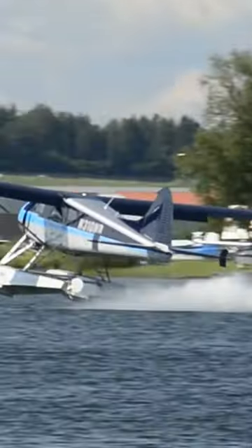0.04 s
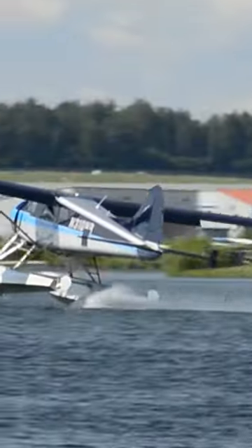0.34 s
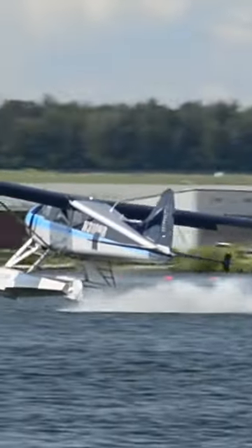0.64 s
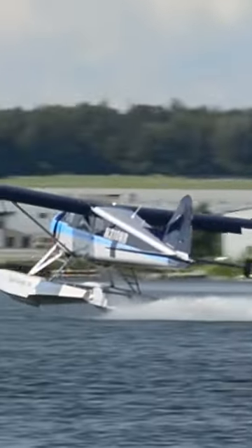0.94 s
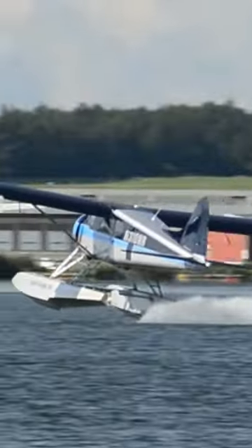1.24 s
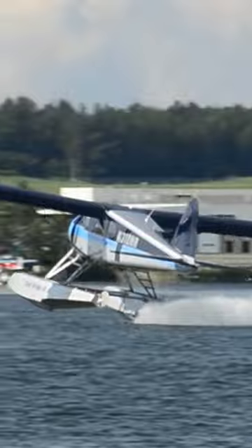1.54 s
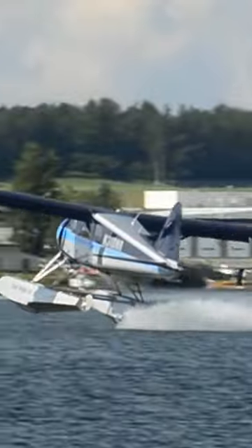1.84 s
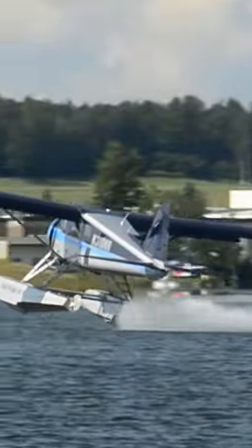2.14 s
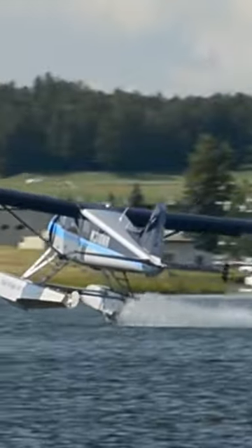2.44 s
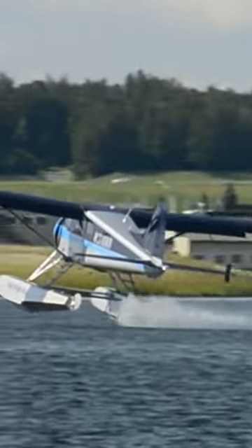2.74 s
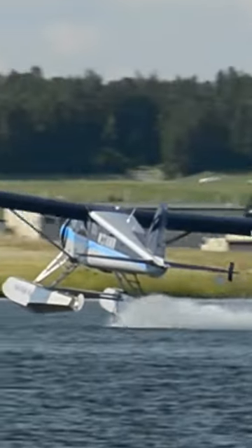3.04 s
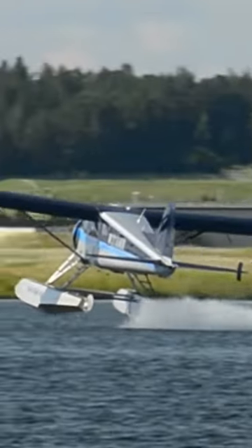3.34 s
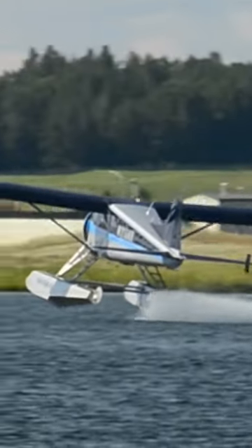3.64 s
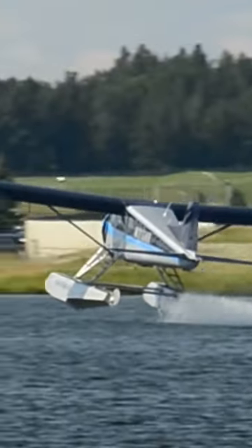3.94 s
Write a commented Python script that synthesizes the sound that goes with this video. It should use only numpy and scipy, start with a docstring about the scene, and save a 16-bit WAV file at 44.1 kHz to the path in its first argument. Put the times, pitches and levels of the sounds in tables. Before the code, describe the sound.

A floatplane's propeller engine drones loudly as it skims across a lake, with faint spray hiss.

```python
"""The loud, deep drone of a floatplane skimming across a lake at full power and moving away.
Its nine-cylinder radial engine puffs out exhaust so fast that the puffs blend into notes, and the
propeller adds a hum. The tone shifts as the plane is heard first from the side, then from behind.
Rough exhaust gas roars in time with the firings. The floats splash once and throw up hissing spray,
over a little rumbling wind."""
import sys
import numpy as np
from scipy import signal
from scipy.io import wavfile
from scipy.ndimage import uniform_filter1d

SR = 44100
rng = np.random.default_rng(int(sys.argv[2]) if len(sys.argv) > 2 else 0)


def unload_wav(signal):
    """Save mono or channel-first audio to the path in sys.argv[1] as 16-bit WAV at rate SR, clipped to [-1, 1]."""
    wavfile.write(
        sys.argv[1],
        SR,
        np.round(np.clip(np.atleast_2d(signal).T, -1, 1) * 32767).astype(np.int16),
    )


N = 176400
TIME = np.arange(N) / SR
FRAME_S = np.arange(N // 256 + 5)[:, None] * 256 / SR  # coarse time steps for slow changes
BIN_HZ = np.fft.rfftfreq(1024, 1 / SR)  # the pitches at which noise is shaped
CYLINDERS, CRANK_TURNS = 9, 2  # in one cycle each cylinder fires once and the crank turns twice

# How fast the engine runs: time_s, cycle_rate_hz
ENGINE_SPEED = [(0.3, 18.065), (1.4, 18.052), (2.0, 17.97), (2.65, 17.91), (2.95, 17.941), (3.2, 17.896),
                (3.45, 17.903), (3.7, 17.849)]
START_RATE_HZ = ENGINE_SPEED[0][1]

def engine_cycles():
    """Counts the cycles run so far. A "harmonic" is a tone that vibrates a whole number of times in each."""
    return np.cumsum(curve(ENGINE_SPEED)) / SR


# How loud the engine's main note is: time_s, level_db (before a small lift)
FIRING_LEVEL = [(0.06, -19.5), (1.44, -18.5), (2.18, -20.5), (2.24, -17.5), (2.75, -21), (2.84, -17.5),
                (3.19, -21.5), (3.47, -18), (3.7, -24), (3.94, -20.5)]

def firing_tone(cycles):
    """The nine firings of each cycle add up to the firm main note."""
    lift_db = 0.53
    wave = np.cos(2 * np.pi * CYLINDERS * cycles + puff_phase(CYLINDERS))
    return np.sqrt(2) * gain_of(curve(FIRING_LEVEL) + lift_db) * wave


# The balance of the drone's low tones: harmonic_number, from_side_db, from_behind_db
DRONE_TONES = [(4, -18.5, -12), (5, -25, -21), (7, -18, -8.5), (8, -30, -18), (10, -18.5, -18.5),
               (11, -8.5, -7), (12, -12, -9.5), (13, -17.5, -10.5), (14, -20, -8), (16, -6, -9.5),
               (17, -18, -22), (18, -9.5, -19), (19, -25, -16), (20, -7.5, -8.5), (21, -12, -17.5),
               (22, -5, -4), (23, -15.5, -18.5), (24, -20, -9.5), (25, -13.5, -25), (26, -14.5, -9),
               (27, -14, -13.5), (28, -12.5, -17.5), (29, -15, -20), (30, -23.5, -12.5)]
# High tones that sing out of the roar: harmonic_number -> lift_db
SINGING_TONES = {32: 3, 54: 4, 80: 8, 82: 6}

def exhaust_drone(cycles):
    """Nine unevenly spaced puffs a cycle make a stack of harmonics, whose mix shifts as the plane turns."""
    side_db, tail_db, top_harmonic = -19.5, -20.5, 112
    high_db, high_from_hz, high_db_per_octave, high_tail_lift_db = -41, 724, -19.5, 2
    t = FRAME_S[:, 0]
    behind = turned(t)
    low_db = {round(k): (1 - behind) * (side_db + side) + behind * (tail_db + tail)
              for k, side, tail in DRONE_TONES}
    out = np.zeros(N)
    for k in range(1, top_harmonic + 1):
        hz = k * START_RATE_HZ
        if k in low_db:
            db = low_db[k]
        elif k > max(low_db):
            db = high_db + high_db_per_octave * np.log2(max(hz / high_from_hz, 1))
            db = db + high_tail_lift_db * behind + SINGING_TONES.get(k, 0)
        else:
            continue
        # Echoes smear the puffs, more so for high tones and from behind.
        smear = 0.676 * rng.standard_normal() + 0.92 * behind * rng.standard_normal()
        phase = puff_phase(k) + smear * (hz / 268.2) ** 2
        steady = gain_of(swell_db(t, hz)) * np.exp(1j * phase)
        # The air makes high tones waver more, and faster. All waver a little more from behind.
        waver = 0.11 + (hz / 810) ** 3 + 0.12 * behind
        wander = waver * drift(rate_hz=2.2 * (1 + hz / 600))
        strength = gain_of(db) * (steady + wander) / np.hypot(1, waver)
        wave = np.exp(2j * np.pi * k * cycles)
        out += np.sqrt(2) * (np.interp(TIME, t, strength) * wave).real
    return out


def puff_phase(harmonic):
    """Where a harmonic's wave starts: each cylinder's puff takes its own path round the exhaust ring."""
    longest_path_s, outlet_turns = 0.001634, 0.062
    fired = np.arange(CYLINDERS) / CYLINDERS
    place_turns = CRANK_TURNS * fired + outlet_turns  # the firing skips every other cylinder
    path_share = 2 * abs(place_turns % 1 - .5)
    leaves_pipe = fired + longest_path_s * START_RATE_HZ * path_share
    return np.angle(np.exp(-2j * np.pi * harmonic * leaves_pipe).sum())


# Brief swells and dips in the engine: peak_s, spread_s, pitch_hz, glide_hz_per_s, width_hz, lift_db
SWELLS = [(.5, .17, 600, 0, 170, -2.5), (.3, .2, 1080, 0, 130, 4.5), (.85, .08, 490, 0, 45, 4),
          (.94, .1, 745, 150, 45, 11), (1.2, .15, 835, 300, 35, 4.5), (1.45, .4, 1500, 0, 250, -3),
          (1.685, .06, 728, 0, 40, 12), (1.87, .1, 396, 0, 15, 3), (2.03, .08, 735, 0, 45, 6.5),
          (2.1, .6, 485, -55, 42, 5), (2.1, 1.0, 210, 0, 90, 1.5), (2.33, .18, 1030, 0, 170, 4.5),
          (2.1, .25, 1520, 0, 180, 2.5), (2.49, .05, 780, 0, 130, 5.5), (3.2, .12, 780, 0, 60, 4),
          (3.55, .5, 1460, 0, 110, 4), (3.6, .45, 380, 0, 55, 2), (3.8, .14, 1750, 0, 110, 6.5)]

def swell_db(t, hz):
    """Narrow bands of the drone and roar grow louder or softer for a moment; some slide in pitch."""
    return sum(db * np.exp(-((t - peak) / spread) ** 2 - ((hz - pitch - glide * (t - peak)) / width) ** 2)
               for peak, spread, pitch, glide, width, db in SWELLS)


# How loud the propeller hums: time_s, level_db
PROPELLER_LEVEL = [(0.05, -23.5), (0.2, -17), (0.5, -18.0), (0.72, -23), (1.0, -17), (1.2, -22.6),
                   (1.5, -22.5), (1.7, -20), (1.88, -26), (2.05, -22), (2.36, -20.5), (2.5, -24),
                   (2.9, -22.5), (3.1, -23), (3.3, -23), (3.45, -29), (3.65, -22), (3.8, -30.5),
                   (3.95, -19.5)]

def propeller(cycles):
    """Three blades pass six times a cycle; their hum weakens and breaks up as the plane turns away."""
    passes, start_turns = 6, 0.25
    wave = np.sin(2 * np.pi * (passes * cycles + start_turns))
    return np.sqrt(2) * gain_of(curve(PROPELLER_LEVEL)) * wave


# The roar's mix of bass and treble from the side: pitch_hz, relative_db
ROAR_COLOUR = [(30, -28.5), (90, -3), (200, -4), (330, -3.5), (480, -1.5), (740, -4), (880, -11.5),
               (1050, -10), (1320, -18.5), (1450, -15), (1600, -19.5), (2000, -25.5), (2800, -33.5),
               (4000, -34.5), (4800, -41.5), (6200, -47.5), (7200, -59.5), (15000, -81.5)]
# How that mix changes from behind: pitch_hz, lift_db
ROAR_LIFT_BEHIND = [(30, 6.5), (200, 4.5), (400, 1.5), (750, -1), (1200, 6), (1600, 3.5), (2200, 3),
                    (4000, 0)]

def exhaust_roar(cycles):
    """Swirling gas puffs with each firing, crank turn and roughly each cycle; it blurs from behind."""
    level_db, blur_share = -22.5, 0.39
    shape_db = colour(ROAR_COLOUR) + turned(FRAME_S) * colour(ROAR_LIFT_BEHIND)
    gas = noise(shape_db + swell_db(FRAME_S, BIN_HZ), patch_db=1.65)
    clear = 1 - blur_share * turned(TIME)
    puffs = throb(cycles, CYLINDERS, depth=0.15 * clear)
    puffs *= throb(cycles, CRANK_TURNS, depth=0.21 * clear)
    puffs *= throb(cycles, 0.96, depth=0.15 * clear)
    return gain_of(level_db) * gas * puffs


# How loud the spray off the floats is: time_s, level_db
SPRAY_LEVEL = [(0, -53), (.23, -50.5), (.3, -46), (.62, -45), (1.05, -51.5), (1.5, -49.5), (1.75, -46),
               (2.03, -41), (2.42, -41), (2.5, -43), (2.55, -44.5), (3.0, -53.5), (3.5, -50.5), (4, -45.5)]
# The spray's mix of bass and treble: pitch_hz, relative_db
SPRAY_COLOUR = [(500, -23), (1500, -13.5), (2400, 1.5), (3300, 3), (4100, 1.5), (4800, -11), (6300, -11),
                (7100, -23.5), (8500, -27), (10000, -36.5), (15000, -43.5)]

def spray(cycles):
    """Spray hisses in surges, flutters with the crank and loses treble as the plane turns away."""
    treble_from_hz, dulling_db_per_octave = 3300, 6
    octaves = np.log2(np.maximum(BIN_HZ / treble_from_hz, 1))
    treble_db = dulling_db_per_octave * (.5 - turned(FRAME_S)) * octaves
    water = noise(colour(SPRAY_COLOUR) + treble_db, patch_db=1.7)
    return gain_of(curve(SPRAY_LEVEL)) * water * throb(cycles, CRANK_TURNS, depth=0.22)


# The splash's mix of bass and treble: pitch_hz, relative_db
SPLASH_COLOUR = [(1500, -11), (4000, 0.5), (6300, -3.5), (8800, -10), (11000, -21.5)]

def splash():
    """A float meets the water again: a crisp burst of drops that dies away."""
    start_s, rise_s, decay_s, level_db, clump_db = .28, .03, 0.15, -56, 6.5
    age = np.maximum(TIME - start_s, 0)
    burst = np.minimum(age / rise_s, 1) * np.exp(-age / decay_s)
    flicker = unit_level(uniform_filter1d(rng.standard_normal(N), size=130))
    clumps = unit_level(gain_of(clump_db * flicker))
    return gain_of(level_db) * burst * clumps * noise(colour(SPLASH_COLOUR), patch_db=0)


# The wind's mix, nearly all bass: pitch_hz, relative_db
WIND_COLOUR = [(5, -6), (25, 1), (50, -4.5), (100, -11), (300, -26), (2000, -66.5)]

def wind(level_db=-44.5):
    """Wind rumbles on the microphone in soft gusts."""
    return gain_of(level_db) * noise(colour(WIND_COLOUR), patch_db=4)


# How loud the background hiss is: time_s, level_db (before the lift)
HISS_LEVEL = [(0, -69), (1.2, -71), (2.2, -69), (3.2, -65.5), (4, -66.5)]
# Its nearly even mix of bass and treble: pitch_hz, relative_db
HISS_COLOUR = [(1000, 0), (8000, 0), (15000, -1)]

def hiss(lift_db=5.5):
    """A faint, smooth hiss that slowly grows."""
    return gain_of(curve(HISS_LEVEL) + lift_db) * noise(colour(HISS_COLOUR), patch_db=0)


def turned(t, halfway_s=1.88, length_s=2.06):
    """Near 0 while the plane is heard from the side, near 1 once it is heard from behind."""
    return .5 + .5 * np.tanh(2 * (t - halfway_s) / length_s)


def throb(cycles, beats_per_cycle, depth):
    """A volume that rises and falls with the engine."""
    return 1 + depth * np.cos(2 * np.pi * (beats_per_cycle * cycles + rng.random()))


def gain_of(db):
    """Turns decibels into a number to multiply by."""
    return 10 ** (np.asarray(db) / 20)


def unit_level(x):
    """Scales a signal so its average level (rms) is 1."""
    return x / np.sqrt(np.mean(abs(x) ** 2) + 1e-20)


def curve(points):
    """Joins a table's points over time, giving a value for every sample."""
    return np.interp(TIME, *np.transpose(points))


def colour(points):
    """Joins a table's points over pitch, giving decibels for each of BIN_HZ."""
    hz, db = np.transpose(points)
    return np.interp(np.log(BIN_HZ + 1), np.log(hz), db)


def drift(rate_hz):
    """A slow random wobble in strength and phase, one value for each of FRAME_S."""
    hz = np.fft.fftfreq(2048, FRAME_S[1, 0])
    spectrum = rng.standard_normal((len(hz), 2)) @ [1, 1j]
    return unit_level(np.fft.ifft(spectrum / (1 + (hz / rate_hz) ** 2)))[:len(FRAME_S)]


def noise(shape_db, patch_db):
    """Noise of level 1 with a chosen mix of pitches and random louder and softer patches."""
    real, imaginary, patches = rng.standard_normal((3, len(FRAME_S), len(BIN_HZ)))
    patches = uniform_filter1d(patches, size=16, axis=0)  # smooth over time
    patches = unit_level(uniform_filter1d(patches, size=6, axis=1))  # and over pitch
    spectrum = (real + 1j * imaginary) * gain_of(shape_db + patch_db * patches)
    return unit_level(signal.istft(spectrum.T, nperseg=1024, noverlap=768)[1][:N])


def scene():
    """Adds up plane, water and air; one engine speed sets the pace of the tones and throbs."""
    cycles = engine_cycles()
    plane = firing_tone(cycles) + exhaust_drone(cycles) + propeller(cycles) + exhaust_roar(cycles)
    return (plane + spray(cycles) + splash() + wind() + hiss())[None]


def record(dry):
    """A limiter steps the volume down at loud peaks and quickly lets go; then the top treble is cut."""
    ceiling, step_db, release_db_per_s = .61, .13, 60
    fade_in_s, top_hz = .003, 15500
    over_db = 20 * np.log10(np.maximum(abs(dry) / ceiling, 1))
    stepped_db = step_db * np.ceil(over_db / step_db)  # each sudden step makes a faint tick
    release_db = release_db_per_s * TIME
    cut_db = np.maximum.accumulate(stepped_db + release_db, axis=1) - release_db
    limited = dry / gain_of(cut_db) * np.minimum(TIME / fade_in_s, 1)
    treble_cut = signal.firwin(511, top_hz, window=("kaiser", 9), fs=SR)
    return signal.oaconvolve(limited, treble_cut[None], "same")


dry = scene()
out = record(dry)
unload_wav(out)
```